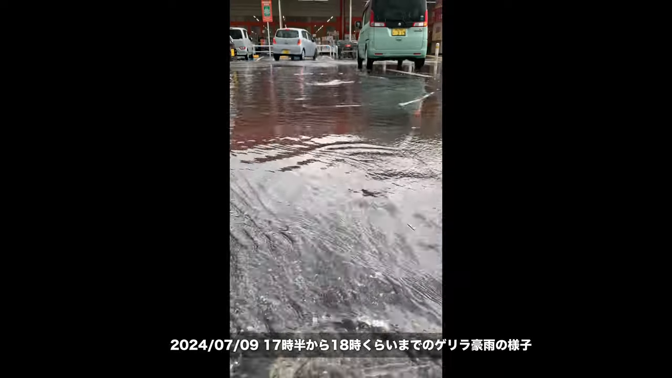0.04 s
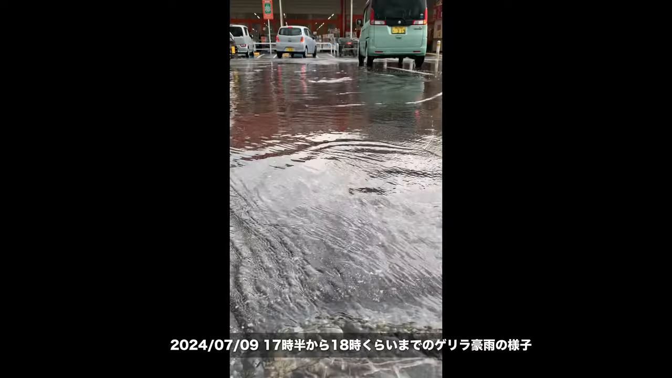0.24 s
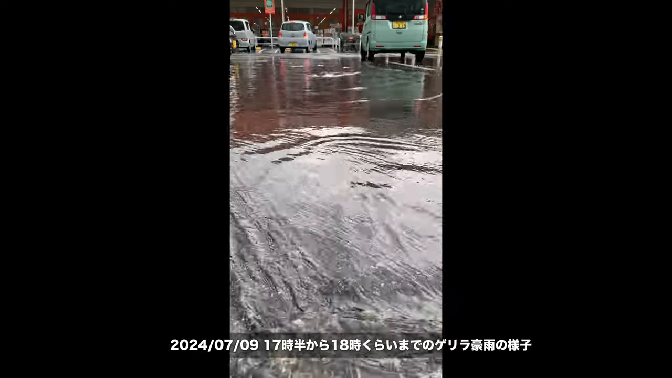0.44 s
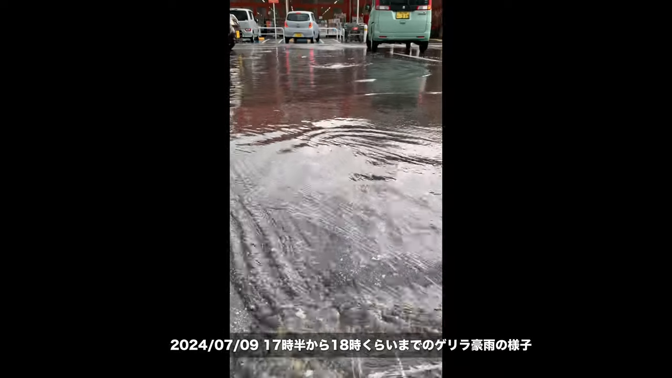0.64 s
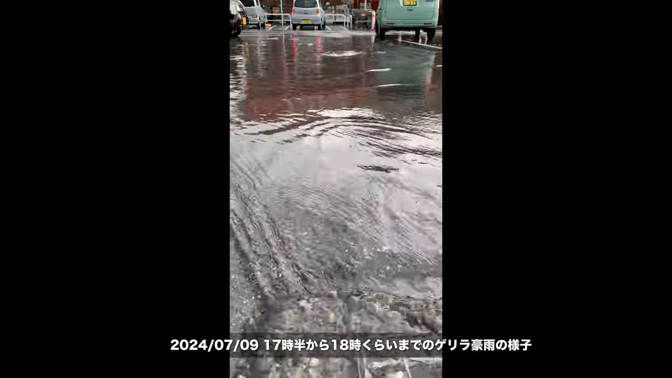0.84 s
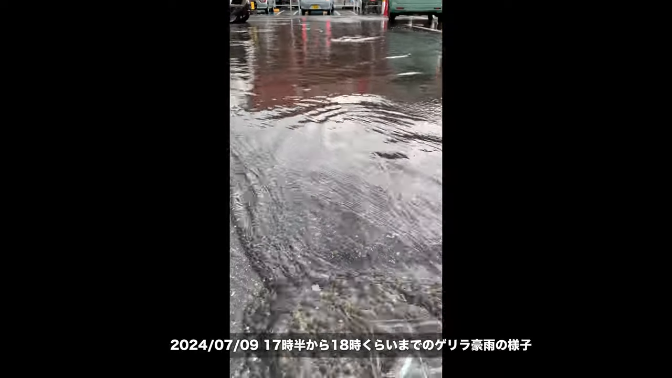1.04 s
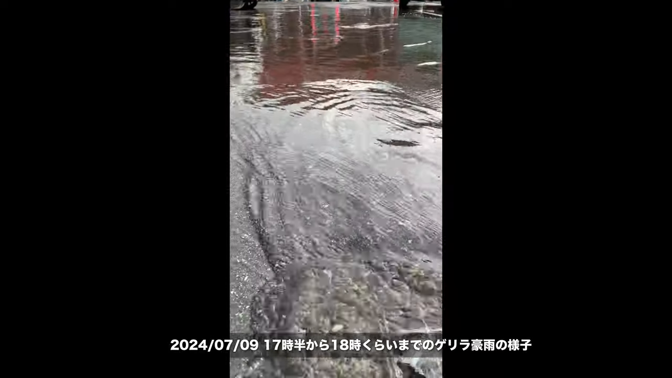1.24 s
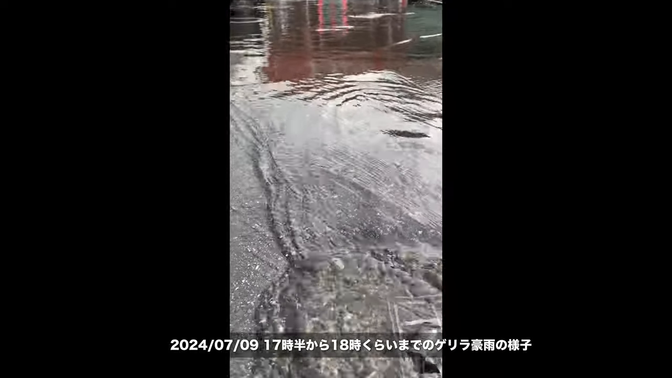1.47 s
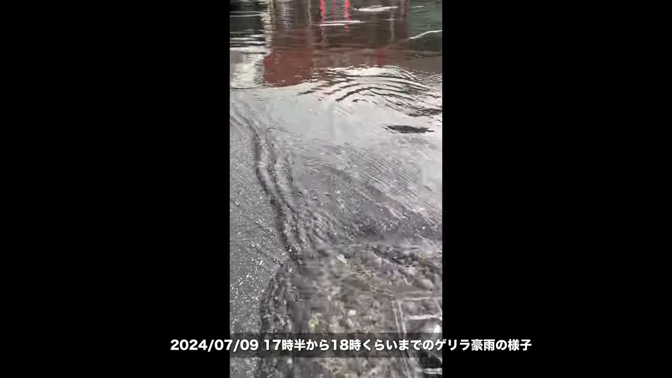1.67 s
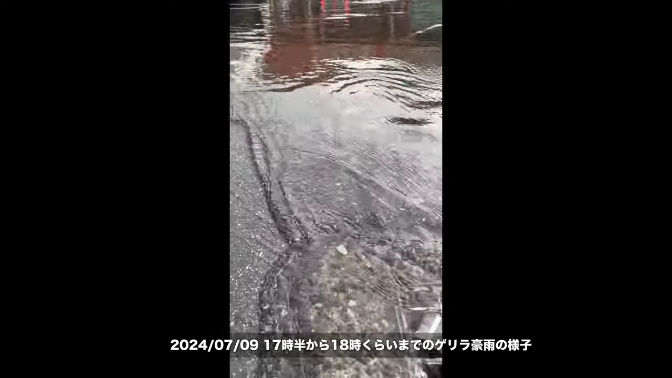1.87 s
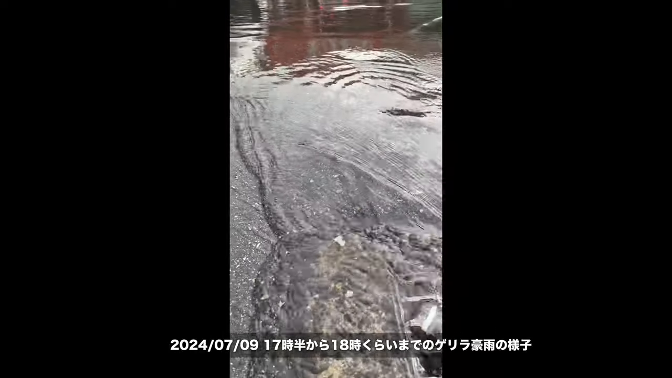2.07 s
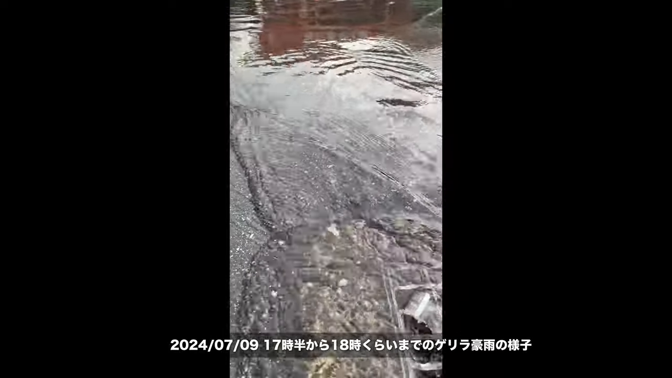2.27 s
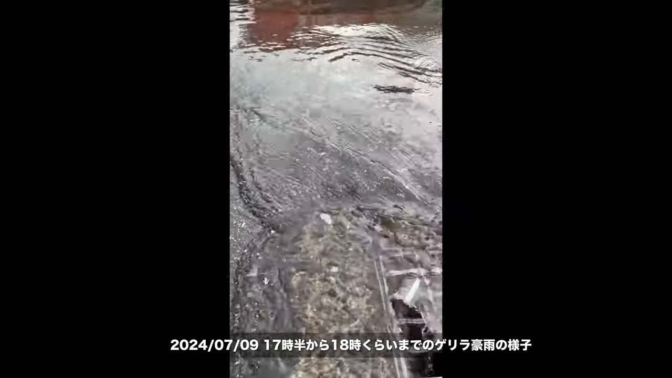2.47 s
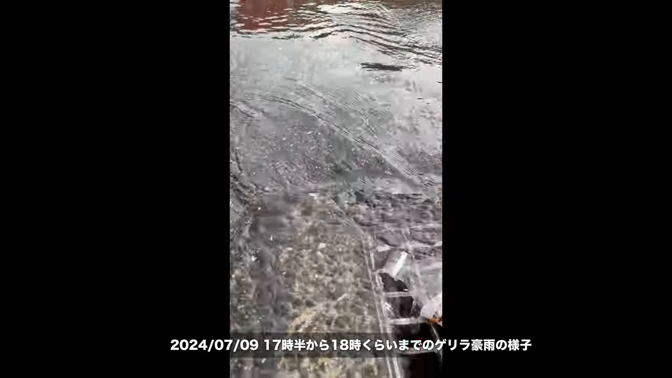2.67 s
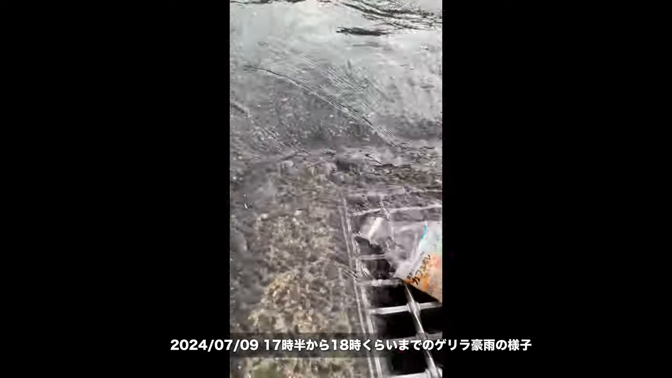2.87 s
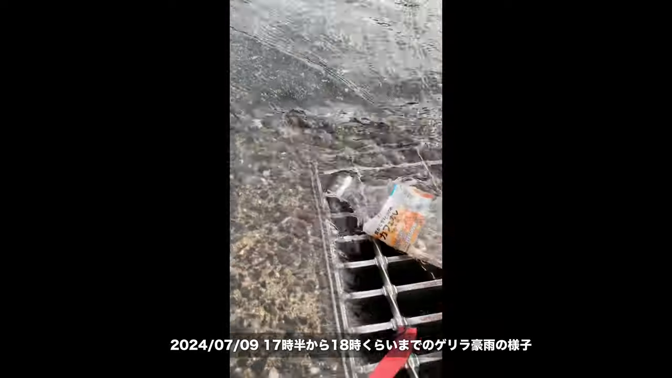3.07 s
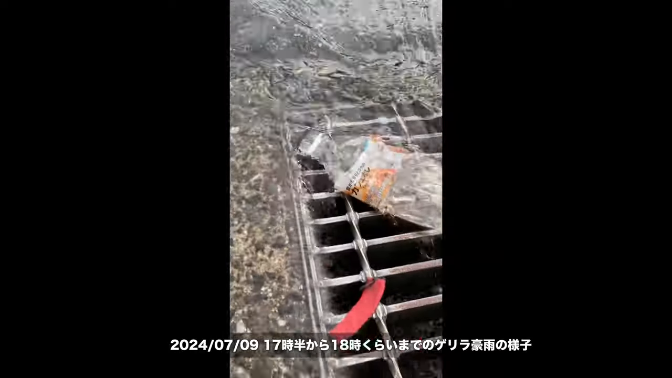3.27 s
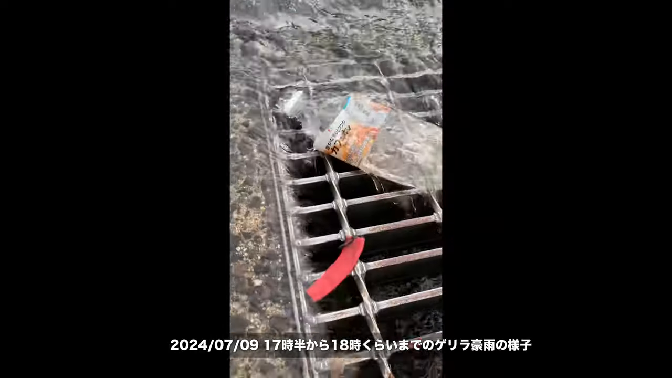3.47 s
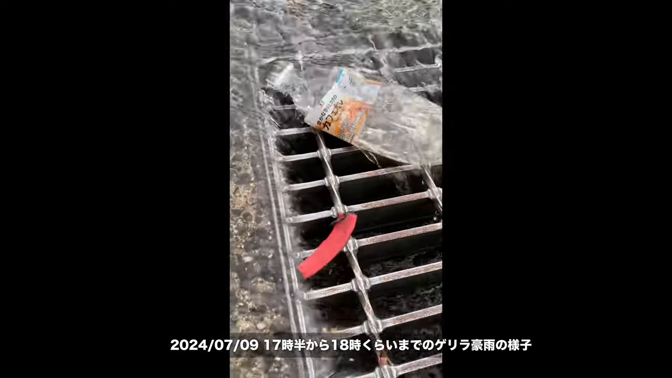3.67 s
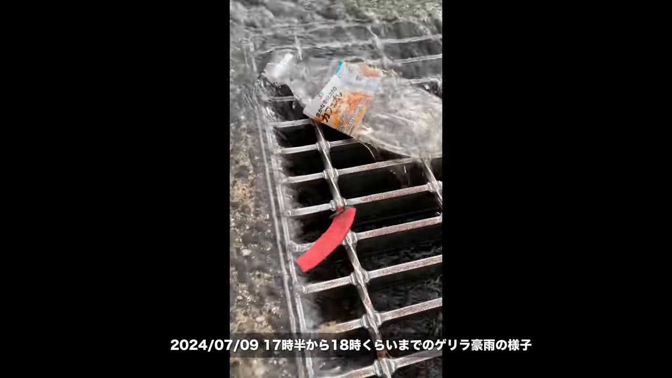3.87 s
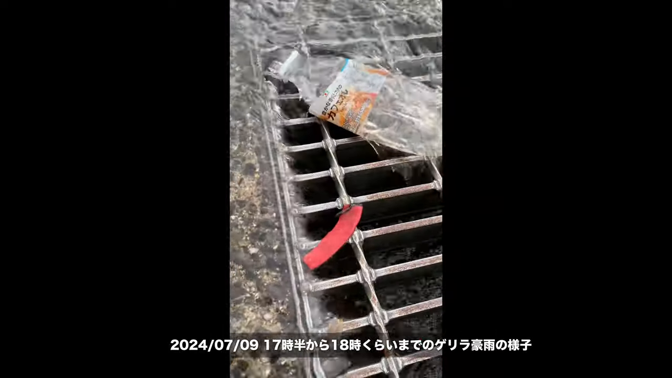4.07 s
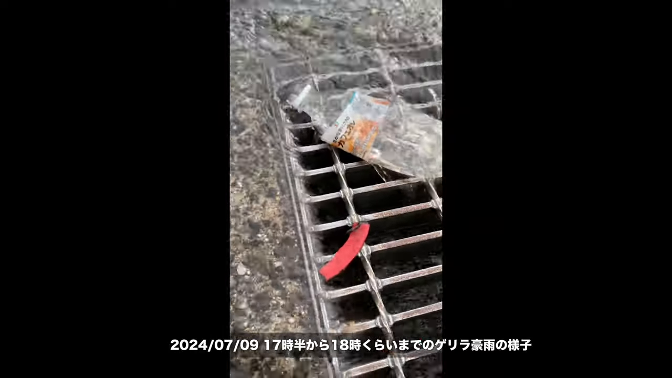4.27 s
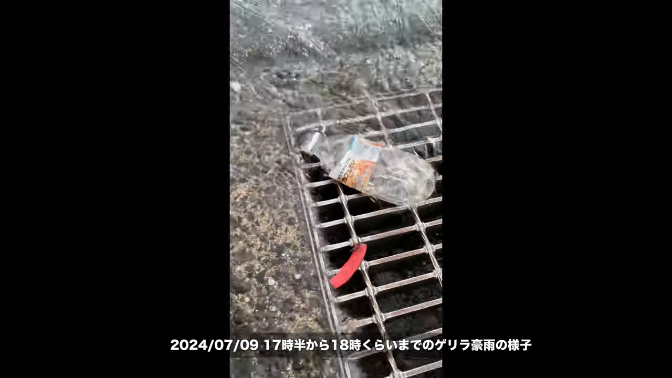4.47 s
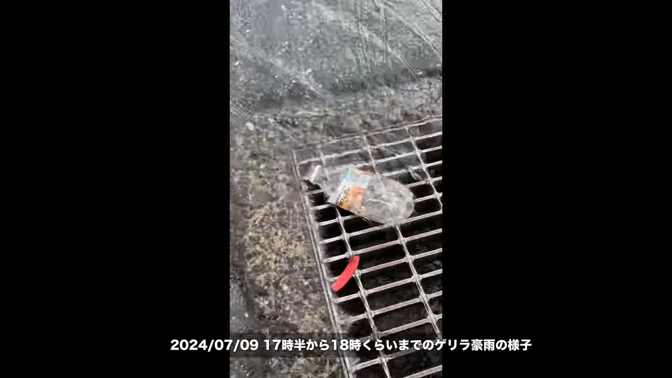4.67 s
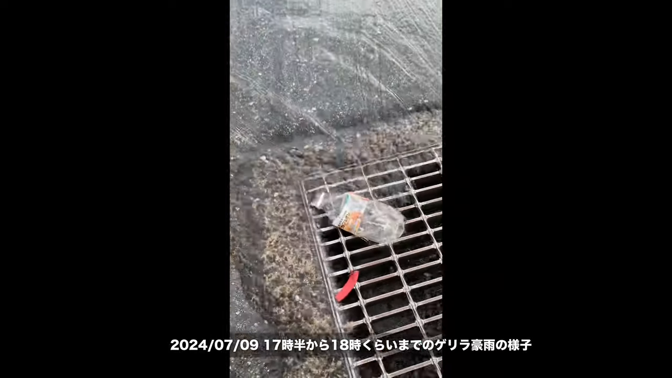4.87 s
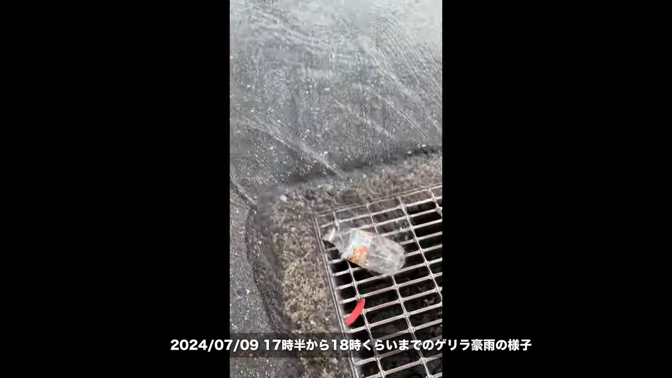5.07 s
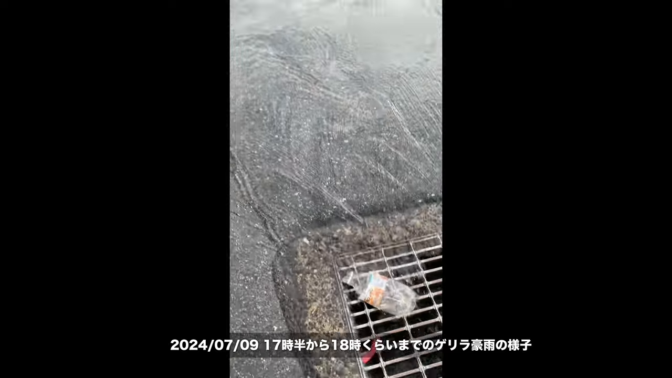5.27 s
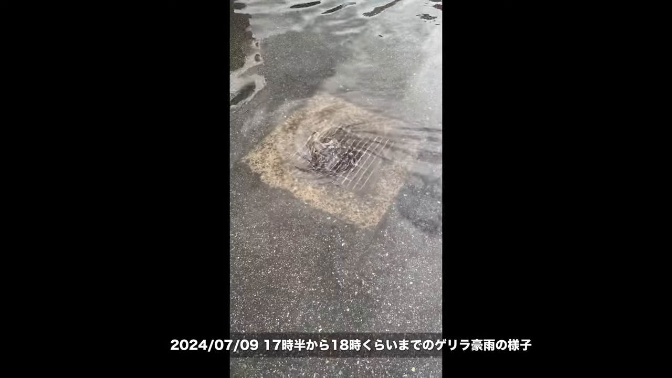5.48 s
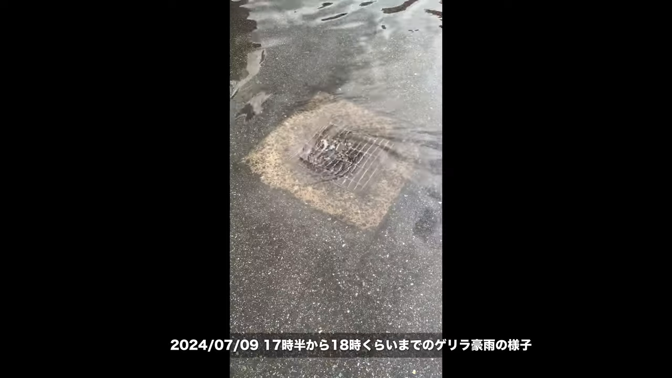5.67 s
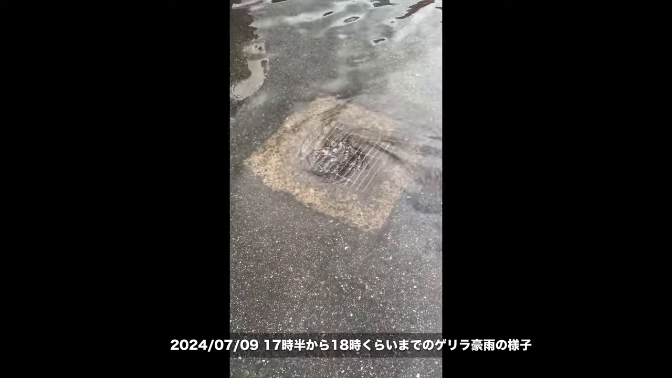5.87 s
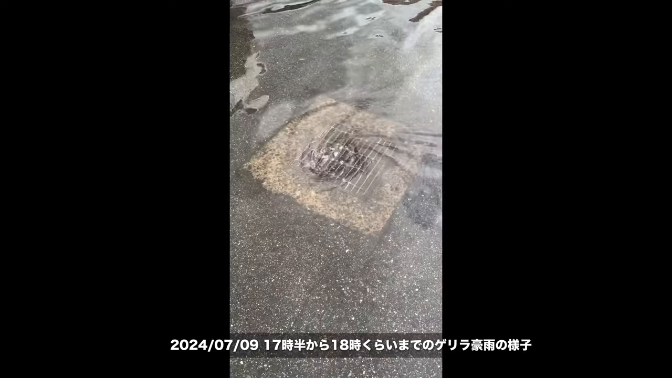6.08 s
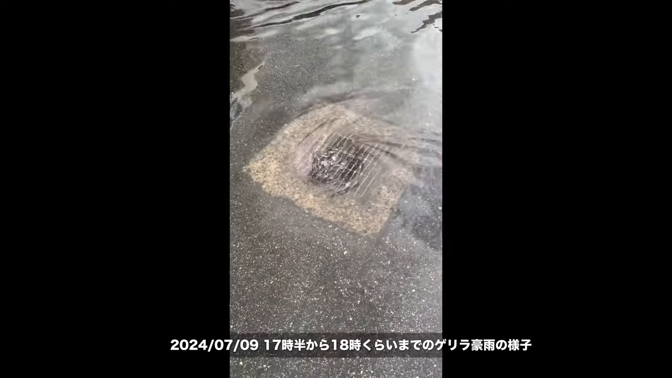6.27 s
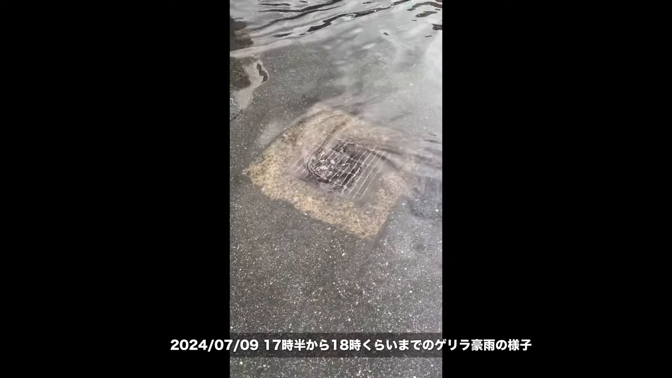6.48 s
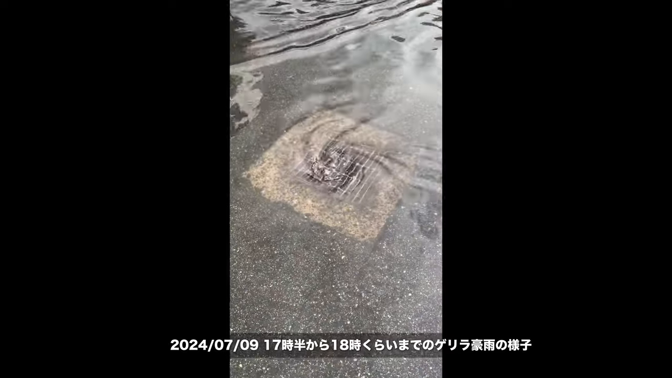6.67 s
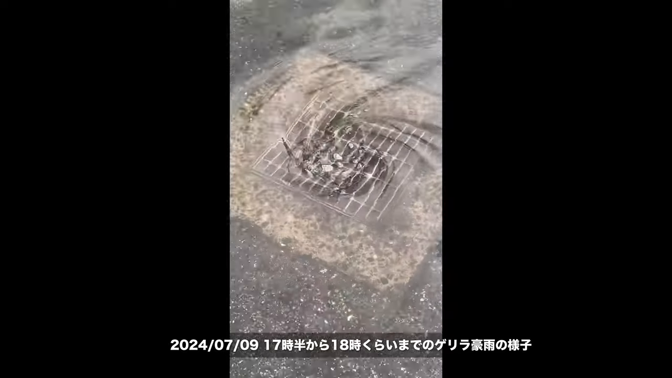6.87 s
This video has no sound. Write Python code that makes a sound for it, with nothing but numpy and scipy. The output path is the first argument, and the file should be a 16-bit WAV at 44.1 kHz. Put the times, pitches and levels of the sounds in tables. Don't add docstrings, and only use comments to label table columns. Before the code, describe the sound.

From 0 s, a bright, fizzing wash of floodwater runs off pavement through a steel grate, moderately near, with scattered ticks of drops, an occasional hollow bubble and soft low wind thumps on a phone microphone. Around 2.4 s drops and bubbles grow denser as the phone approaches. From about 3 to 4.3 s it is closest: the spray swells loudly, sharp spatter crowds in, and gulped air rings in low glugs and quick bright plips. From 4.3 to 5.3 s it backs off and the water softens. At 5.3 s the sound cuts abruptly to a calmer, darker pool swirling into another drain, smooth and with little fizz, its gurgle slowly growing while spray fades. A very faint, thin high brake squeal passes at 5.5-5.9 s, and one rounded glug comes at 6.6 s. Distant traffic rumble and wind buffeting persist to 7 s.

```python
import sys
import numpy as np
from scipy import signal
from scipy.fft import rfft, irfft, next_fast_len
from scipy.io import wavfile
from scipy.ndimage import uniform_filter1d

SR = 44100
rng = np.random.default_rng(int(sys.argv[2]) if len(sys.argv) > 2 else 0)


def master(y):
    cut = np.clip(np.atleast_2d(y).T, -1, 1)
    pcm = np.round(cut * 32767)
    wavfile.write(sys.argv[1], SR, pcm.astype(np.int16))


def invert_db(level):
    return 10 ** (np.asarray(level, dtype=float) / 20)


N = 306054
CUT_S = 5.313


def evened(x):
    return x / np.sqrt(np.mean(x ** 2) + 1e-20)


def read(points, hz, column=1):
    table = np.transpose(points)
    return np.interp(np.log(hz + 1), np.log(table[0] + 1), table[column])


def follow(rows, t):
    table = np.transpose(rows)
    return np.interp(t, table[0], table[1])


def add(mix, start_s, sound):
    part = mix[round(start_s * SR):][:len(sound)]
    part += sound[:len(part)]


def split(x, hz):
    low = signal.sosfiltfilt(signal.butter(2, hz, fs=SR, output="sos"), x)
    return low, x - low


def ring(hz, cycles, glide, rise):
    u = np.arange(int(3 * cycles * SR / hz) + 8) * hz / SR / cycles
    shape = (1 - np.exp(-u / max(rise, .01))) * np.exp(-2.3 * u)
    return shape / shape.max() * np.sin(2 * np.pi * cycles * u * (1 + glide * u))


def wash(n, colour, size, patchy_db, flicker_db):
    frames, hz = 4 * n // size + 5, np.fft.rfftfreq(size, 1 / SR)
    a, b, patches, flicker = rng.standard_normal((frames, len(hz), 4)).T
    patches = uniform_filter1d(uniform_filter1d(patches, size=5, axis=0), size=12, axis=1)
    flicker = uniform_filter1d(uniform_filter1d(flicker, size=70, axis=0), size=5, axis=1)
    level_db = read(colour, hz)[:, None] + patchy_db * evened(patches) + flicker_db * evened(flicker)
    z = (a + 1j * b) * invert_db(level_db)
    return signal.istft(z, nperseg=size, noverlap=size * 3 // 4)[1][:n]


def grains(n, colour, lo_hz, hi_hz, cycles, per_s, spread_db, clump_db, count):
    out, t = np.zeros(n), np.arange(600) / SR
    clumps = invert_db(clump_db * evened(uniform_filter1d(rng.standard_normal(n), size=500)))
    for hz in np.geomspace(lo_hz, hi_hz, count):
        when, size, sign = rng.random((int(per_s * n / SR / count), 3)).T
        strength = invert_db(-spread_db * np.log(size + .02)) * np.sign(sign - .5)
        train = np.bincount((when * n).astype(int), strength, n)
        grain = ring(hz, cycles, 0.097, 0.29)
        grain *= invert_db(read(colour, hz)) * np.sqrt(hz) / np.linalg.norm(grain)
        out += signal.oaconvolve(train * clumps, grain)[:n]
    tail = invert_db(-19 - 60 * t / 0.014) * rng.standard_normal(len(t))
    return evened(out + signal.oaconvolve(out, tail)[:n])


# pitch_hz, density_db (per Hz)
WATER_COLOURS = [
    [(120, -8), (300, 1.5), (450, 0), (650, -1.5), (1300, 0), (2300, -6), (4000, -12), (6000, -11), (11000, -13), (13500, -20), (16000, -17.5)],
    [(120, -45), (300, -1), (500, 1), (750, -7.5), (1300, -1), (2500, -8.5), (3500, -11), (7500, -15), (9200, -11.5), (12000, -15), (16000, -27)],
]


def water(gurgle_db, spray_db, shot, bubbles_db, fizz_db):
    colour, n = WATER_COLOURS[shot], len(spray_db)
    low, high = split(wash(n, colour, size=512, patchy_db=1.5, flicker_db=0.78), 2760.0)
    bubbles = grains(n, colour, 343.7, 2197, 8.3, 500, 3.6, 2.6, count=16)
    fizz = grains(n, colour, 2474, 12440, 4.0, 1500, 3.4, 3.36, count=16)
    gurgle = evened(low) + invert_db(bubbles_db) * bubbles
    spray = evened(high) + invert_db(fizz_db) * fizz
    return invert_db(gurgle_db) * evened(gurgle) + invert_db(spray_db) * evened(spray)


# time_s, level_db
NEARNESS = [(0.0, -43.5), (0.77, -40.5), (1.14, -44), (1.59, -41), (1.8, -42.5), (2.95, -38), (3.23, -38),
            (3.38, -33), (4.16, -33.5), (4.87, -38.5), (5.12, -39), (5.3, -41.5)]


def grate_spray_db(t):
    nearness_db = follow(NEARNESS, t) + 38
    return -32.5 + 1.08 * nearness_db


# time_s, gurgle_db
INTAKE = [(0.0, -37), (1.42, -37.5), (1.53, -36), (1.92, -38.5), (2.72, -34), (3.1, -35.5), (3.35, -32.5),
          (4.09, -31.5), (4.31, -31.5), (4.68, -35.5), (5.15, -35.5), (5.27, -37.5), (5.3, -33.5)]


def grate_water(t):
    return pavement(water(1 + follow(INTAKE, t), grate_spray_db(t), 0, -2.9, 0.13), t)


def pavement(x, t):
    centre_hz, width_hz, share = 657, 98, 0.58
    edges_hz = [centre_hz - width_hz / 2, centre_hz + width_hz / 2]
    band = signal.sosfiltfilt(signal.butter(1, edges_hz, "bandpass", fs=SR, output="sos"), x)
    lowered = np.clip((t - 2.16) / 0.58 + .5, 0, 1)
    short_of_grate = np.clip((3.1 - t) / 0.19 + .5, 0, 1)
    return x - share * short_of_grate * lowered * band


# level_db (as the scene changes), drift_db_per_s
POOL = [
    (-44.5, 1.34),
    (-42.5, -2),
]


def pool_water(t):
    gurgle_db, spray_db = (db + drift * (t - CUT_S) for db, drift in POOL)
    return water(gurgle_db, spray_db, 1, -6.0, -23.0)


def strays(count):
    when, size, pitch = rng.random((count, 3)).T
    start_s = when * (CUT_S - .1)
    peak_db = grate_spray_db(start_s) + 13 - 5.4 * size
    return list(zip(start_s, peak_db, 5500 + 6000 * pitch))


# start_s, peak_db, pitch_hz
TICKS = [(0.379, -17, 10500), (0.854, -25, 6100), (1.253, -16.5, 11400), (1.3664, -23.5, 11600),
         (1.5504, -21, 11300), (1.9114, -21, 10500), (2.0926, -19.5, 6050), (2.1094, -25, 6770),
         (2.149, -27, 6680), (2.2338, -20, 6500), (2.3108, -21, 5440), (2.4486, -13.5, 11200),
         (2.579, -15, 10300), (2.6673, -18, 7500), (2.9427, -16.5, 7320), (2.988, -18, 11300),
         (3.0599, -10, 6300), (3.2014, -23, 6200), (3.2537, -12, 10400), (3.2919, -10, 11000),
         (3.3283, -22.5, 10200), (3.4276, -16, 6000), (3.595, -13, 11700), (3.7108, -17, 6400),
         (4.0143, -15, 7400), (4.0492, -21.5, 6080), (4.2173, -9, 7140), (4.5082, -17, 10200),
         (4.805, -14.5, 6450)]
# start_s, peak_db, pitch_hz
SPLASHES = [(0.5367, -19, 7070), (0.766, -18, 5750), (0.8106, -20, 11500), (1.05, -40, 11700),
            (2.4084, -15.5, 6940), (2.4823, -16, 6600), (3.019, -12.5, 7000), (3.1825, -9, 10900),
            (3.222, -8, 6200), (3.2363, -16, 10700), (3.276, -18, 6610), (3.3141, -9.5, 11300),
            (3.356, -10, 10700), (3.3862, -13, 7050), (3.4491, -15, 11700), (3.6167, -19, 7160),
            (3.6973, -18, 10800), (3.7723, -17, 10800), (3.8432, -11, 6240), (3.8623, -13, 5770),
            (3.93, -19.5, 7450), (3.9566, -9.5, 10800), (4.025, -7.5, 6500), (4.0673, -12, 7340),
            (4.1704, -15, 6960), (4.2637, -17, 10700), (4.5815, -17, 7320), (4.8713, -21, 10200),
            (5.1823, -17, 6660)]


def spatter():
    out, t = np.zeros(N), np.arange(500) / SR
    rows = [(*row, 2.2, 7.5) for row in TICKS]
    rows += [(*row, 3, 2) for row in [*SPLASHES, *strays(count=36)]]
    for (start_s, db, hz, cycles, ring_db), spit in zip(rows, rng.standard_normal((len(rows), 500))):
        add(out, start_s + .0006, invert_db(db + ring_db) * ring(hz, cycles, 0.012, 0.09))
        bright_spit = np.convolve(spit, [1, 1, -1, -1], "same") / 2
        add(out, start_s, invert_db(db - 7.0 - 60 * t / 0.017) * bright_spit)
    return out


# start_s, peak_db, pitch_hz, ring_cycles
GLUGS = [(0.264, -21.5, 844, 9.3), (0.816, -24, 481, 14), (1.159, -33, 384, 14.6), (1.559, -25, 886, 15),
         (1.582, -22.5, 1365, 25), (2.596, -23.5, 943, 11.3), (3.003, -23, 1050, 21),
         (3.159, -19.5, 422, 7.5), (3.195, -22.5, 475, 10.5), (3.268, -19, 1080, 11),
         (3.319, -17, 399, 9.6), (3.469, -12.5, 1205, 8.3), (3.501, -25.5, 426, 15), (3.549, -26, 444, 11),
         (3.751, -19, 1250, 9.3), (3.833, -19, 727, 12), (3.942, -21, 486, 12), (4.064, -15, 714, 3.3),
         (4.199, -18, 717, 8.0), (4.249, -27, 466, 10), (4.378, -18, 1120, 12), (4.449, -28, 880, 21),
         (4.602, -27, 553, 4.1), (5.239, -25, 623, 18), (5.292, -27, 656, 14), (6.61, -17.5, 513, 5.9)]
# start_s, peak_db, pitch_hz
PLIPS = [(2.0288, -27, 2190), (2.166, -26, 1580), (2.6987, -23, 1880), (2.7586, -22, 3280),
         (2.7965, -17, 2010), (3.048, -18, 3070), (3.1852, -21, 1610), (3.2251, -22, 1530),
         (3.6232, -36, 1440), (3.6681, -20, 2070), (3.7489, -21, 1960), (3.8817, -21, 1710),
         (4.152, -21, 1460), (4.2474, -23, 1880), (4.3116, -20, 1980), (4.368, -20, 1590),
         (4.426, -20, 1820), (4.4797, -26, 1630), (4.579, -20, 2080), (4.6034, -21, 2100),
         (4.624, -19.5, 1800), (4.6663, -23, 3290), (4.7551, -20, 1480), (4.8192, -27, 1590),
         (5.2393, -22.5, 1550)]


def glugs():
    out = np.zeros(N)
    for start_s, db, hz, cycles in GLUGS + [(s, db + 4, hz, 8.5) for s, db, hz in PLIPS]:
        cycles = max(cycles, 1.5)
        add(out, start_s, invert_db(db - 4.5) * ring(hz, cycles, 0.026, 0.26))
        add(out, start_s, invert_db(db - 14.5) * ring(1.2 * hz, cycles, 0.056, 0.13))
    return out


# start_s, peak_db, pitch_hz, ring_cycles
THUMPS = [(0.018, -25.5, 62.9, 5.2), (0.216, -21, 61.5, 4.5), (0.62, -23.5, 157, 8.8),
          (0.657, -22.5, 185, 7.1), (1.219, -26, 53.7, 4.8), (1.46, -31, 58, 4.1), (1.529, -26, 53.8, 3.0),
          (2.259, -34, 83.4, 4.2), (2.44, -21.5, 255, 5.3), (3.981, -24, 344, 7.4), (4.027, -24, 322, 9.8),
          (4.068, -26, 320, 9.9), (4.796, -32, 140, 2.7), (5.055, -30, 77.5, 5.7), (5.636, -21.5, 69, 2.9),
          (5.734, -24, 58.5, 3.3), (5.839, -25, 60.6, 2.1), (6.26, -28.5, 88, 5.7),
          (6.455, -25.5, 49.4, 3.5), (6.563, -30, 47, 2.5), (6.68, -31, 64.6, 2.1), (6.898, -23, 53.6, 6.1)]


def buffets():
    out = np.zeros(N)
    for start_s, db, hz, cycles in THUMPS:
        add(out, start_s, invert_db(db - 6.0) * ring(hz, max(cycles, 1.5), 0.036, 0.6))
    return out


# pitch_hz, density_db (per Hz)
RUMBLE_COLOUR = [(15, -29), (25, -23), (43, -2), (59, 3.5), (124, -4.5), (188, -0.5), (288, -14.5),
                 (320, -19), (420, -42), (700, -120)]
# time_s, level_db
TRAFFIC = [(0.0, -39), (0.48, -39.5), (1.93, -38.5), (2.11, -38), (3.44, -40), (3.79, -43), (4.19, -39),
           (5.02, -41.5), (5.47, -43), (5.8, -39.5), (5.99, -41.5), (6.94, -39)]


def rumble(t, lift_db):
    low = wash(len(t), RUMBLE_COLOUR, size=4096, patchy_db=1.0, flicker_db=-1.37)
    return invert_db(follow(TRAFFIC, t) + lift_db) * evened(low)


# start_s, end_s, pitch_hz, level_db
SQUEAL = (5.5, 5.93, 12530, -59)


def squeal():
    start_s, end_s, hz, db = SQUEAL
    t, out = np.arange(0, end_s - start_s, 1 / SR), np.zeros(N)
    waver = 1 + .0008 * evened(uniform_filter1d(rng.standard_normal(len(t)), size=1500))
    add(out, start_s, invert_db(db) * np.hanning(len(t)) * np.sin(2 * np.pi * np.cumsum(hz * waver) / SR))
    return out


# pitch_hz, likeness (0-1), left_lead_rad
PORTS = [
    [(60, .965, -.1), (200, .97, -.2), (400, .94, -.4), (700, .83, -.75), (1400, .86, -.3), (2000, .75, 1.1), (2800, .25, 1.5), (3500, .65, 1.3)],
    [(60, .962, -.1), (300, .92, -.3), (700, .55, -1.5), (1000, .65, -3.9), (1400, .78, -4.2), (2000, .78, -4.3), (3200, .5, -4.5), (3600, .7, -4.7)],
]
PORT_TOPS = [
    [(4200, .88, 2.5), (4800, .985, 3.37)],
    [(4200, .76, 2.45 - 2 * np.pi), (4800, .985, 3.37 - 2 * np.pi)],
]
# pitch_hz, left_over_right_db
LEAN = [(60, .3), (180, 2.), (400, .3), (1650, -.8), (4000, 0)]


def ports(x, shot):
    table, delay_s = PORTS[shot] + PORT_TOPS[shot], 1 / 4250
    z = signal.stft(x, nperseg=1024)[2]
    scrambled = z * np.exp(2j * np.pi * rng.random(z.shape[::-1]).T)
    other = evened(signal.istft(scrambled, nperseg=1024)[1][:len(x)]) * x.std()
    n = next_fast_len(len(x))
    hz = np.fft.rfftfreq(n, 1 / SR)
    same = np.clip(read(table, hz), 0, 1)
    lead = read(table, hz, column=2) + 2 * np.pi * delay_s * np.maximum(hz - table[-1][0], 0)
    right = same * rfft(x, n) * np.exp(-1j * lead) + np.sqrt(1 - same ** 2) * rfft(other, n)
    return np.array([x, irfft(right * invert_db(-read(LEAN, hz)), n)[:len(x)]])


def scene():
    t, cut = np.arange(N) / SR, round(CUT_S * SR)
    events = spatter() + glugs() + buffets() + squeal()
    a, b = t[:cut], t[cut:]
    grate = grate_water(a) + rumble(a, 2.35) + events[:cut]
    pool_events = events[cut:] * (b > CUT_S + .1)
    pool = pool_water(b) + rumble(b, 1.7) + pool_events
    return np.hstack([ports(grate, 0), ports(pool, 1)])


def top_cut(x):
    return signal.sosfilt(signal.butter(12, 16990, fs=SR, output="sos"), x)


def record(dry):
    headroom = .6
    limited = headroom * np.tanh(dry / headroom)
    return top_cut(limited)


dry = scene()
out = record(dry)
master(out)
```